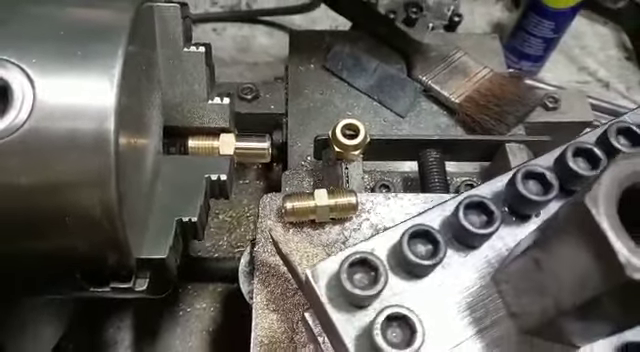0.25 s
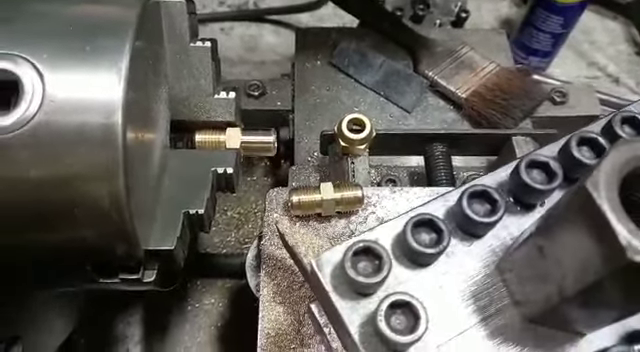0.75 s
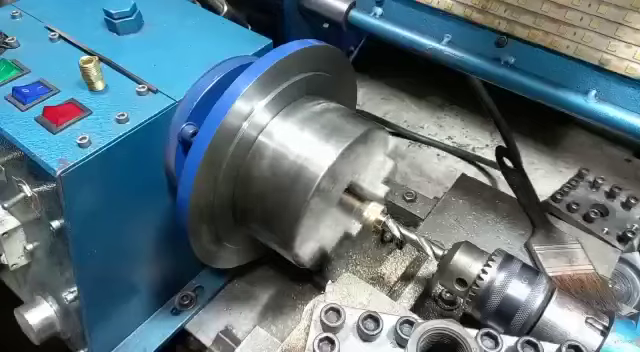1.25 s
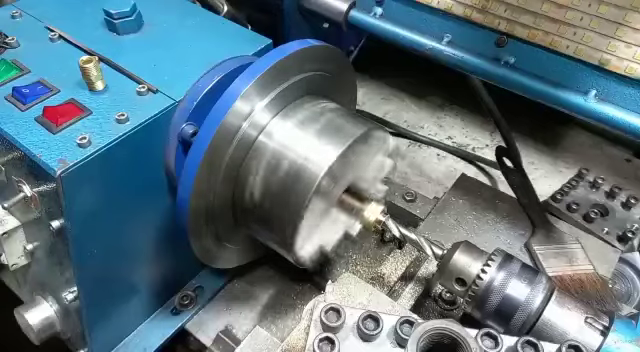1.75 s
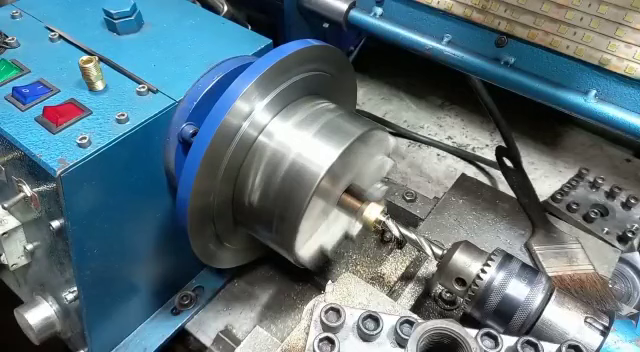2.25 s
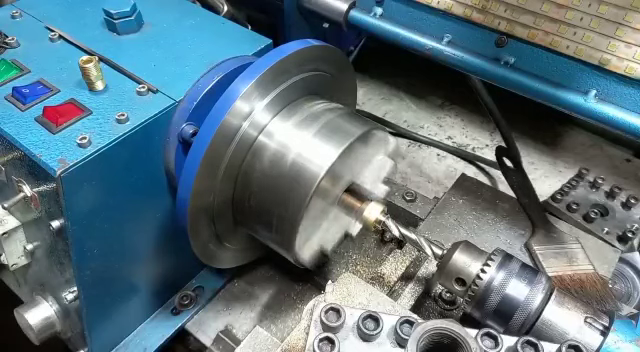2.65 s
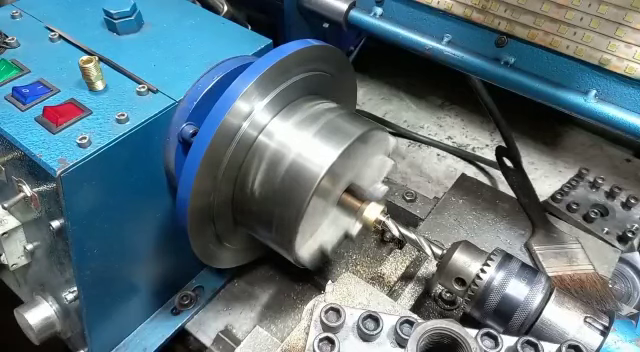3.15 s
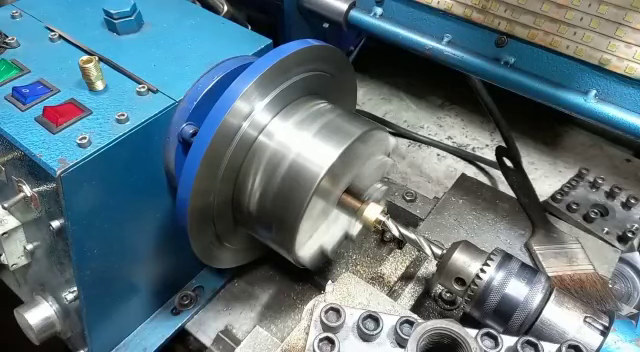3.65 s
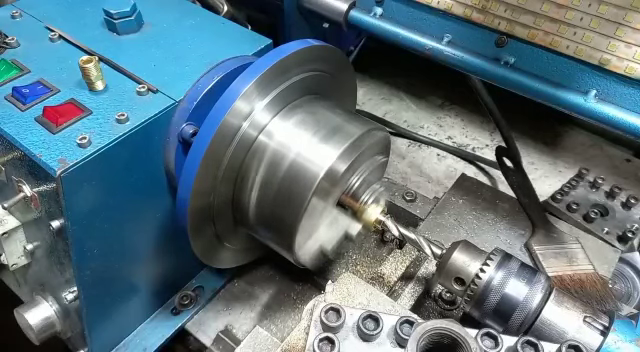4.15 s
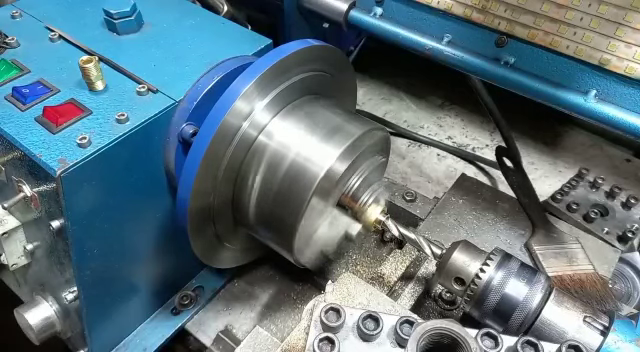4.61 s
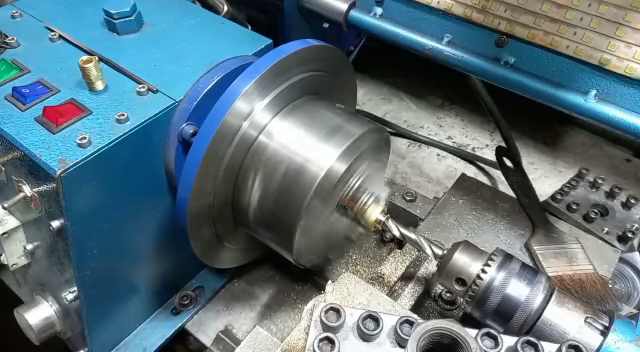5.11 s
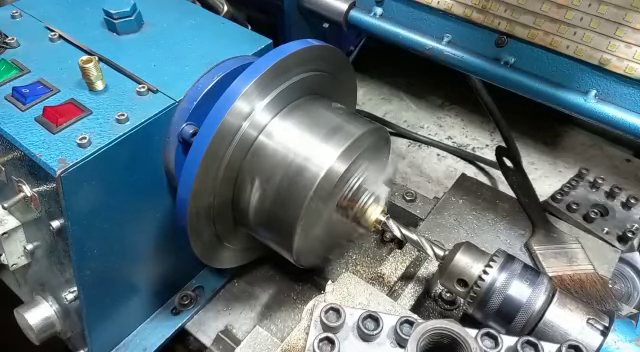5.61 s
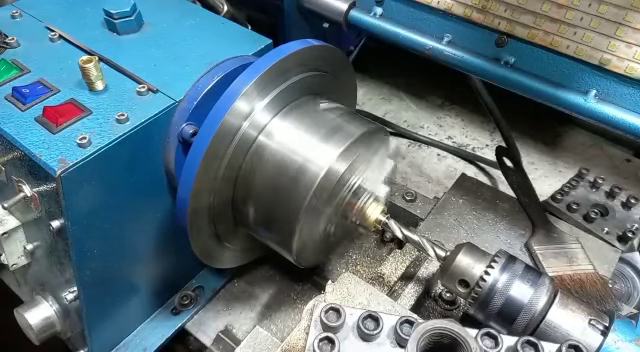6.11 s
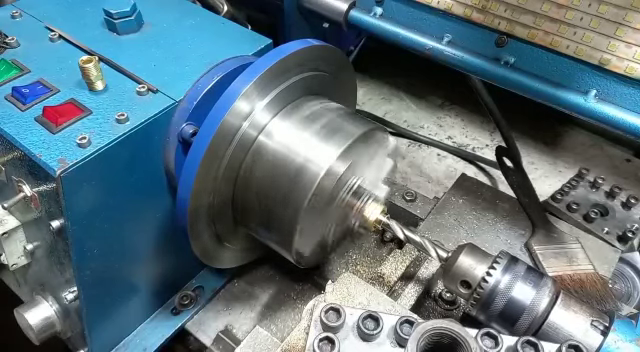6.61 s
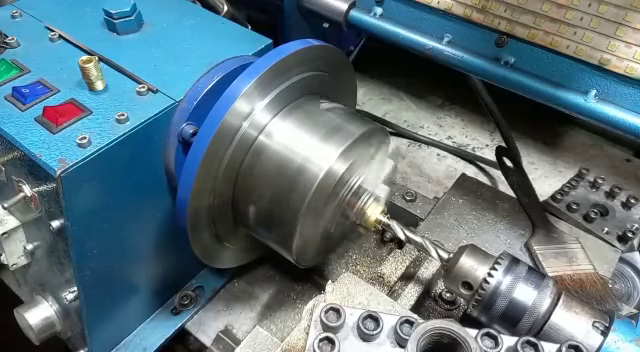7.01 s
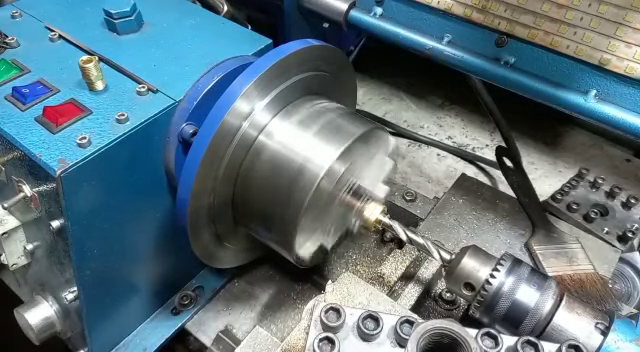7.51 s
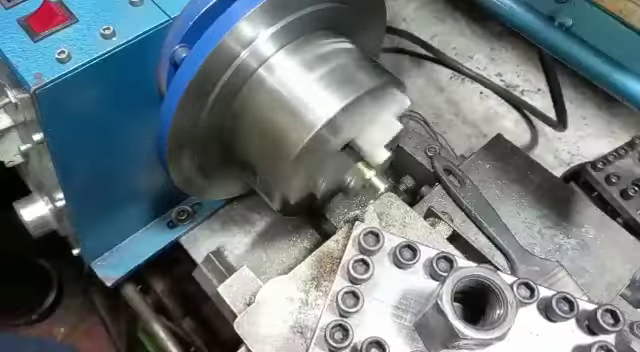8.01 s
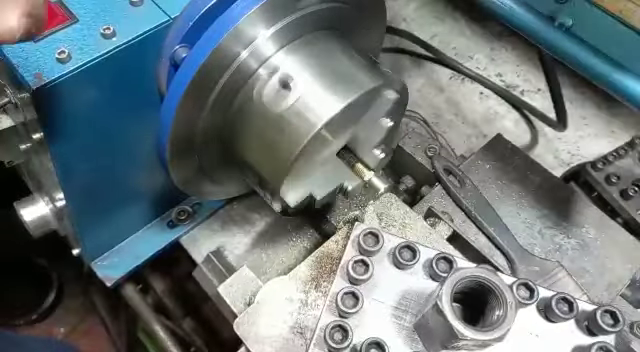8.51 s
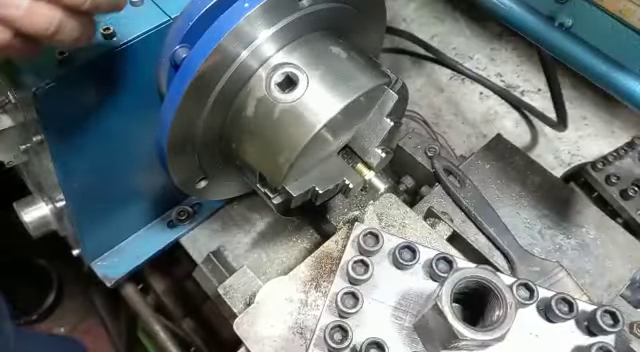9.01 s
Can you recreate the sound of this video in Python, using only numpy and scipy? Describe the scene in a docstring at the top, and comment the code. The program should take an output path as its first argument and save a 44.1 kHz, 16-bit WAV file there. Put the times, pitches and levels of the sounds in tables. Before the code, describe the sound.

Quiet workshop hum stops abruptly, then a drill squeals and hisses harshly into brass before the lathe whirs down and a switch clicks.

```python
"""A small metal lathe in a humming workshop, heard by two close microphones.
First only room noise, a fan and a soft hollow bump, which stop abruptly; then a drill bores into brass.
It chatters as a random swing amid hissing, ringing chip noise, locks into squeals with overtones as the
feed eases, then bites again under a lighter push, over gear growl and bed rumble.
Last the spindle runs free and fades with the drive's sine whine; switch clicks ring a panel."""
import sys
import numpy as np
from scipy import signal
from scipy.fft import rfft, irfft, next_fast_len
from scipy.io import wavfile
from scipy.ndimage import uniform_filter1d, map_coordinates

SR = 44100
rng = np.random.default_rng(int(sys.argv[2]) if len(sys.argv) > 2 else 0)


def file_out(sig):
    """Save sig as 16-bit WAV at sys.argv[1]."""
    # one column per channel
    cols = np.atleast_2d(sig).T
    # limit, then scale
    lim = np.clip(cols, -1, 1)
    pcm = np.round(lim * 32767).astype(np.int16)
    wavfile.write(sys.argv[1], SR, pcm)


N = 408321  # length (samples)
BREAK, DRILLING, RUNNING_FREE = 1.014, 1.095, 7.728  # first room noise ends, drilling starts and ends (s)


def amp(db):
    """Decibels to gain."""
    return 10 ** (np.asarray(db) / 20)


def unit(x):
    """Scaled to rms 1."""
    return x / np.sqrt(np.mean(np.abs(x) ** 2) + 1e-20)


def clock():
    """The time of every sample (s)."""
    return np.arange(N) / SR


def curves(rows):
    """One value per sample for each column after the time."""
    seconds, *columns = np.transpose(rows)
    return [np.interp(clock(), seconds, column) for column in columns]


def between(start, end):
    """1 from start to end, with 3 ms edges."""
    return np.clip(np.minimum(clock() - start, end - clock()) / .003, 0, 1)


def swells(rows):
    """Sum of bell-shaped envelopes, one for each (time [s], level [dB], spread [s]) row."""
    t = np.arange(0, N / SR, .0005)
    bells = 0
    for s, db, spread in rows:
        bells = bells + amp(db) * np.exp(-.5 * np.minimum(((t - s) / spread) ** 2, 100))
    return np.interp(clock(), t, bells)


def wobble(rate):
    """A smooth random curve, rate knots a second."""
    knots = rng.standard_normal(int(N * rate / SR) + 4)
    return map_coordinates(knots, [clock() * rate], order=2)


def filtered(x, response):
    """x times a response of frequency."""
    m = next_fast_len(N + 8192, True)
    return irfft(rfft(x, m) * response(np.fft.rfftfreq(m, 1 / SR)), m)[..., :N]


def colour(points):
    """Response through (frequency [Hz], level [dB]) points on a log axis."""
    f, db = np.transpose(points)
    return lambda hz: amp(np.interp(np.log(hz + 1), np.log(f), db))


def ringing(modes):
    """Response of (frequency [Hz], width [Hz], level [dB]) resonances with steep skirts."""
    return lambda hz: sum(amp(db) / (1 + ((hz - f) / width) ** 2) for f, width, db in modes)


def modal(depth_db, spacing_hz):
    """Response of many close small resonances, at random heights."""
    knots = rng.standard_normal(4096)
    return lambda hz: amp(depth_db * map_coordinates(knots, [hz / spacing_hz], order=1, mode="wrap"))


def pan(db):
    """Left and right gains of constant power, for a left-minus-right difference."""
    g = np.array([amp(db / 2), amp(-db / 2)]).reshape(2, -1)
    return g / np.sqrt(np.mean(g ** 2, axis=0))


def ears(pan_db, lag):
    """Direct sound reaches the two ears unequal and out of step by lag (rad)."""
    return pan(pan_db) * np.exp(.5j * np.array([-lag, lag]).reshape(2, -1))


# Two close microphones hear the low mids alike: (frequency [Hz], side against middle [dB])
STEREO_WIDTH = [(60, -4), (130, -17), (250, -11.5), (450, -9), (700, -2.5), (1100, 1.5), (2200, 1),
                (4000, 1), (6300, -1.5), (7500, 1.5), (9000, 6), (11000, -0.5), (13000, 5), (16000, -4)]


def noise(response, side_db):
    """Coloured stereo noise whose middle has rms 1; side_db widens or narrows it."""
    mid = filtered(rng.standard_normal(N), response)
    side = filtered(rng.standard_normal(N), lambda hz: response(hz) * colour(STEREO_WIDTH)(hz))
    return (mid + np.array([[1], [-1]]) * amp(side_db) * side) / np.std(mid)


def flutter(width_hz):
    """The complex envelope of a resonance driven at random."""
    pole = np.exp(-2 * np.pi * width_hz / SR)
    kicks = rng.standard_normal(N) + 1j * rng.standard_normal(N)
    return unit(signal.lfilter([1], np.poly([pole, pole]), kicks))


def patchy(x, depth_db):
    """Narrow bands swell and fade on their own for some tens of milliseconds."""
    z = signal.stft(x, nperseg=1024)[2]
    field = rng.standard_normal(z.shape[1:])  # the same for both ears
    field = uniform_filter1d(uniform_filter1d(field, size=4, axis=0), size=5, axis=1)
    varied = signal.istft(z * amp(depth_db * unit(field)), nperseg=1024)[1][:, :N]
    return unit(varied) * np.sqrt(np.mean(x ** 2))


# Room noise before drilling: (frequency [Hz], relative level [dB per Hz])
ROOM_BEFORE = [(30, -28), (70, -4.5), (130, -11), (250, -3), (400, -4), (650, -9.5), (1000, -14),
               (2200, -15), (4000, -19.5), (6600, -23.5), (7600, -32.5), (16000, -45)]
# Room noise after drilling: (frequency [Hz], relative level [dB per Hz])
ROOM_AFTER = [(30, -13), (80, 8), (180, -14), (280, 2.5), (380, 7), (520, 1), (800, -2.5), (2200, -5.5),
              (4000, -10.5), (6600, -15), (8000, -23.5), (16000, -38)]
# Fan resonances: (frequency [Hz], width [Hz], relative level [dB])
FAN_MODES = [(178, 12, -5.5), (241, 18, 1.5), (531, 8.5, -6), (2033, 36, -8), (2350, 140, -12),
             (6300, 290, -19.5)]


def workshop():
    """Coloured room noise and a fan's wavering hum before and after drilling, with one soft hollow bump."""
    before, after = between(-1, BREAK), between(RUNNING_FREE, np.inf)
    hum = amp(2.4 * wobble(11)) * np.sin(2 * np.pi * 258 * clock() + .4 * wobble(10))
    fan = noise(ringing(FAN_MODES), side_db=-1.0) + amp(3.5) * hum
    bump_envelope = swells([(.604, -37, 0.009), (.65, -51, .03)])
    bump = bump_envelope * np.sqrt(2) * np.sin(2 * np.pi * 357 * clock())
    first = amp(-50) * noise(colour(ROOM_BEFORE), side_db=0.5) + amp(-51.5) * fan + bump
    drone = amp(-57.5) * noise(ringing([(524, 9.5, 1), (2070, 40, -11)]), side_db=-4)
    last = amp(-52) * noise(colour(ROOM_AFTER), side_db=0.5) + amp(-58) * fan + drone
    return before * first + after * last


# Colour of the low rumble: (frequency [Hz], relative level [dB per Hz])
RUMBLE_COLOUR = [(20, -34), (40, -3), (60, -5), (82, 5), (115, 0.5), (160, -12), (300, -14.5), (800, -62)]


def rumble():
    """Low noise, stronger on the right and largely different at each ear."""
    shared, left, right = filtered(rng.standard_normal((3, N)), colour(RUMBLE_COLOUR))
    return pan(-10) * unit(shared + 1.3 * np.array([left, right])) * amp(1.5)


# Low puffs of air on the microphone: (time [s], relative level [dB], spread [s])
AIR_PUFFS = [(1.57, -39, .025), (3.1, -33.5, 0.032), (3.17, -49, 0.027), (6.05, -30, .015),
             (6.175, -29.5, 0.025), (6.92, -28, 0.027), (7.35, -21, 0.036), (7.895, -42, 0.013),
             (8.63, -37, 0.014), (8.868, -41, .01), (8.905, -48, 0.013)]


def puffs():
    """Air pushes on the microphone, heard as short swells of low rumble."""
    return swells(AIR_PUFFS) * rumble()


# Growl of the gearing under load: (time [s], relative level [dB])
GEAR_GROWL = [(1.13, -47), (4.08, -44), (4.92, -47.5), (6.24, -44), (6.79, -37.5), (7.71, -38)]
# Colour of the gear noise: (frequency [Hz], relative level [dB per Hz])
GEAR_COLOUR = [(25, -49), (80, 8), (130, -6), (310, -3.5), (480, 2.5), (620, -1.5), (850, -9), (1310, -8.5),
               (2000, -12), (5000, -45), (16000, -28)]
# Headstock housing and bed resonances: (frequency [Hz], width [Hz], relative level [dB])
HOUSING_MODES = [(180.8, 13.7, 0.5), (258.2, 5.4, 1.5), (501.4, 14, 5), (592, 8.3, -4), (1298, 6.2, 2)]
GEARS_DB = 2.67  # the whole growl over its curve
RUMBLE_DB, RUMBLE_GROWS = -56, 1.83  # bed rumble gain at the median growl (dB); dB per dB of growl


def headstock():
    """Gearing and bearings growl under load and ring the housing; the bed rumbles along with them."""
    growl, = curves(GEAR_GROWL)
    gears = amp(1.0) * noise(colour(GEAR_COLOUR), side_db=-3.5)
    housing = amp(-3.5) * noise(ringing(HOUSING_MODES), side_db=-24)
    bed_db = RUMBLE_DB + RUMBLE_GROWS * (growl - np.median(growl)) + 1.2 * wobble(7.6)
    bed = amp(bed_db) * rumble()
    return amp(growl + GEARS_DB + 0.75 * wobble(30)) * (gears + housing) + bed


# Spindle running free: (time [s], relative level [dB])
SPINDLE_LEVEL = [(7.73, -37.5), (8.02, -38.5), (8.1, -43.5), (8.45, -43.5), (8.56, -54.5), (8.8, -59),
                 (9.25, -64)]
# Colour of the spindle's whir: (frequency [Hz], relative level [dB per Hz])
SPINDLE_COLOUR = [(30, -35), (85, -0.5), (200, -17.5), (380, -7.5), (500, 1.5), (800, -12), (1050, -9.5),
                  (2000, -17), (4000, -23), (6500, -23.5), (8000, -35), (11000, -34), (16000, -40)]
# Motor drive whine over time: (time [s], relative level [dB])
DRIVE_LEVEL = [(7.73, -60), (8.28, -57.5), (8.45, -62), (8.62, -69), (8.8, -75), (8.88, -75), (9.05, -88),
               (9.25, -92)]
# Lines of the drive whine: (frequency [Hz], relative level [dB])
WHINE_LINES = [(5001, -5), (10002, 5.5), (15040, -8)]
# Thin chirps as the speed drops: (time [s], level [dB], spread [s])
SLOWING_CHIRPS = [(8.33, -59, .02), (8.415, -47, .012), (8.455, -48, 0.018), (8.505, -49, 0.02)]


def free_running():
    """The unloaded spindle whirs and fades; the motor drive whines at its switching rate."""
    whir = patchy(noise(colour(SPINDLE_COLOUR), side_db=-2), depth_db=1.5)
    whir = whir + amp(-8.5) * noise(ringing(HOUSING_MODES), side_db=5)
    spindle = amp(curves(SPINDLE_LEVEL)[0] + 0.5 * wobble(25)) * whir
    lines = 0
    for hz, db in WHINE_LINES:
        lines = lines + amp(db + 3.4 * wobble(13)) * np.sin(2 * np.pi * hz * clock() + .8 * wobble(70))
    reflected = noise(ringing([(hz, 30, db) for hz, db in WHINE_LINES]), side_db=1)
    drive = amp(curves(DRIVE_LEVEL)[0]) * (amp(-1) * lines + amp(-2) * reflected)
    chirps = swells(SLOWING_CHIRPS) * noise(ringing([(4830, 14, 7), (11800, 60, -15)]), side_db=-2)
    # three faint returns of the lowest whine line while coasting
    coasting_envelope = swells([(8.8, -61, .02), (8.96, -66, .035), (9.1, -66, .015)])
    coasting = coasting_envelope * np.sqrt(2) * np.sin(2 * np.pi * WHINE_LINES[0][0] * clock())
    return spindle + drive + chirps + coasting


# Clicks of the switch: (time [s], relative level [dB])
SWITCH_CLICKS = [(8.7233, -39), (8.727, -39.5), (8.737, -63), (9.092, -52)]
# Resonances of the switch and its panel: (frequency [Hz], width [Hz], relative level [dB])
PANEL_MODES = [(300, 120, -18), (1300, 300, -3), (2380, 110, -1), (3530, 160, 6), (4600, 160, 1),
               (6750, 360, 1), (9550, 220, -14), (11300, 500, -19), (12600, 170, -13)]


def switch(t60=.055):
    """The rocker switch snaps over with a dry clack and rings its panel, falling 60 dB in t60 (s)."""
    t = clock()
    blows = sum((t > s) * amp(db - 60 * np.clip(t - s, 0, 1) / t60) for s, db in SWITCH_CLICKS)
    clack_colour = colour([(200, 0), (1200, -6), (6500, -3), (8500, -16), (16000, -24)])
    clack = amp(-6.0) * noise(clack_colour, side_db=-1)
    return blows * (amp(-0.5) * noise(ringing(PANEL_MODES), side_db=-2) + clack)


# How hard the drill cuts: a hard push, a let-up, a lighter push: (time [s], load [dB])
CUTTING_LOAD = [(1.11, -26.5), (1.55, -25.5), (1.75, -27.5), (2.05, -26.5), (2.2, -30), (2.5, -31),
                (2.8, -27), (3.4, -28.5), (3.97, -28), (4.175, -21), (4.42, -42.5), (4.9, -45),
                (5.5, -44.5), (6.18, -43.5), (6.3, -40), (6.65, -40), (6.97, -35), (7.71, -36.5)]
# above this load the drill is wedged in the bore, which stiffens it and changes how it radiates
WEDGE_DB, WEDGE_RANGE_DB = -32.5, 1.18


def cutting_load():
    """The load on the cutting edges at every sample (dB)."""
    return curves(CUTTING_LOAD)[0]


# Whistling resonances of the cutting lips: (frequency [Hz], width [Hz], relative level [dB])
LIP_MODES = [(9130, 70, 9.5), (9340, 65, -5), (9590, 67, 13), (11300, 490, -18), (12700, 160, -23),
             (15200, 160, -21)]
WHISTLE_TOP_DB, WHISTLE_FULL_AT_DB, WHISTLE_GROWS = -35, -31, 1.28  # cap, load reaching it, dB per dB below


def whistle(turn):
    """The cutting lips whistle high up, pulsing once a revolution; friction caps the growth with load."""
    db = WHISTLE_TOP_DB + WHISTLE_GROWS * np.minimum(cutting_load() - WHISTLE_FULL_AT_DB, 0)
    return pan(-1.8) * amp(db + 1.2 * turn + 1.5 * wobble(22)) * noise(ringing(LIP_MODES), side_db=-1.2)


# Colour of the chip hiss: (frequency [Hz], relative level [dB per Hz])
CHIP_COLOUR = [(400, -16), (950, -5.5), (1300, -13.5), (1750, -9), (2400, -2), (3500, -5.5), (5400, -4),
               (6400, -2.5), (7500, 0.5), (8550, -9), (9150, -4.5), (10050, -11.5), (10900, -9),
               (16000, -15.5)]
# Drill, chuck and tailstock resonances: (frequency [Hz], width [Hz], relative level [dB])
STEEL_MODES = [(1697, 62, 11), (1898, 27, 13), (2270, 60, 7), (2615, 34, 6), (2980, 72, 6.5), (4380, 52, 8),
               (5980, 90, 3.5), (7460, 117, 5)]
# A chip catches and breaks: (time [s], relative level [dB], spread [s])
CHIP_SNAGS = [(4.625, -38, .008), (4.707, -28.5, 0.0049), (4.73, -40, 0.017), (4.885, -38, .008),
              (4.903, -27.5, 0.0044), (4.995, -37, 0.008), (5.078, -58, .007), (5.17, -36, 0.0033),
              (5.188, -34, 0.0061)]
# Colour of the snags: (frequency [Hz], relative level [dB per Hz])
SNAG_NOISE_COLOUR = [(1500, -39), (4500, -12), (5500, -10), (6300, 21), (8300, -10), (9300, 23),
                     (10500, -5), (13000, 15), (16000, -15)]
HISS_DB, RING_DB, RING_GROWS = -1, -37, 1.09  # hiss over the load; ring at the wedging load, dB per dB of load


def chips(turn):
    """Brass crumbles at the cutting edges; the tiny fractures hiss and ring the steel."""
    load = cutting_load()
    crumble = unit(amp(1.26 * wobble(900) + 1.27 * wobble(90)))
    hiss = amp(load + HISS_DB) * crumble * noise(colour(CHIP_COLOUR), side_db=-2)
    ring = amp(RING_DB + RING_GROWS * (load - WEDGE_DB)) * noise(ringing(STEEL_MODES), side_db=2.5)
    # the contact keeps shifting, and favours other resonances from moment to moment
    cut = patchy(hiss + ring, depth_db=2) * amp(.7 * turn)
    snag_grain = unit(amp(2.7 * wobble(500)))
    snags = amp(-3.5) * swells(CHIP_SNAGS) * snag_grain * noise(colour(SNAG_NOISE_COLOUR), side_db=0)
    machine = modal(depth_db=2, spacing_hz=45)
    return pan(-1.5) * filtered(cut + snags, machine)


# Overtones of the locked tone: (multiple of the pitch, relative level [dB])
SQUEAL_OVERTONES = [(2, -19), (3, -25), (4, -27), (5, -24), (6, -27.5), (7, -32), (8, -27.5), (9, -37),
                    (10, -31.5)]
OVERTONE_FLICKER_DB, OVERTONE_PURITY = .5, 2.2  # flicker per multiple; steady part against the blur


def overtones(phase, bite):
    """Uneven slips add overtones to the squeal, and blur the high ones most."""
    bite = bite * (1 + amp(37.5) * swells(CHIP_SNAGS))  # a caught chip sharpens the slips
    flicker = wobble(60)
    sounding = bite > 0
    sound = np.zeros((2, N))
    for multiple, overtone_db in SQUEAL_OVERTONES:
        blur = np.array([flutter(width_hz=35 + 7 * multiple) for ear in range(2)])
        slip = unit((OVERTONE_PURITY / multiple + blur) * amp(OVERTONE_FLICKER_DB * multiple * flicker))
        cycle = np.exp(1j * multiple * phase[sounding])
        sound[:, sounding] += amp(overtone_db) * np.real(slip[:, sounding] * cycle)
    return bite * sound


# Stick and slip lock into a tone: (start [s], end [s], pitch [Hz], relative level [dB],
# overtones [dB], left minus right [dB], lag between the ears [rad])
LOCKED_TONES = [(2.15, 2.936, 1554, -22.5, -6, 2.5, 1.43), (2.95, 3.9, 1565, -22.5, -7, 9, 1.16),
                (4.24, 4.344, 1514, -18, -3, -1, 2), (4.33, 4.728, 1504, -16.5, -2.5, 5.5, 1.87),
                (4.699, 4.84, 1483, -15.5, -5.5, 2.5, 3.6), (4.81, 4.99, 1498, -14.5, -9.5, 2, 2.4),
                (4.97, 5.10, 1482, -16, -10, 3, 3.2), (5.137, 5.28, 1476, -19, -7.5, 2, 3.3),
                (5.8, 5.88, 1472, -31.5, -6, -6, 3.6), (6.135, 6.19, 1492, -25.5, -14, -4, 2.05),
                (6.215, 6.28, 1504, -28, -12, -6, 2.4), (7.09, 7.21, 1489, -24, -14.5, -3, 2.47)]
SQUEAL_ATTACK_S, SQUEAL_RELEASE_S, SQUEAL_SAG_HZ_PER_S = 0.03, 0.031, 15


def squeal(turn):
    """Where stick and slip lock, the drill sings a sagging tone; overtones come out as the feed eases."""
    dip = 1 - swells([(4.715, -8, 0.0024)])  # the level dips briefly at a snag
    strength = dip * amp(1.2 * wobble(40) + 0.37 * turn)
    tone, pitch, bite = np.zeros((2, N), complex), np.zeros(N), np.zeros(N)
    for start, end, hz, db, overtones_db, pan_db, lag in LOCKED_TONES:
        span = slice(int(start * SR), int(end * SR))
        t = clock()[span]
        edges = np.minimum((t - start) / SQUEAL_ATTACK_S, (end - t) / SQUEAL_RELEASE_S)
        envelope = amp(db) * np.clip(edges, 0, 1)
        pitch[span] = hz - SQUEAL_SAG_HZ_PER_S * (t - t.mean())
        tone[:, span] += envelope * ears(pan_db, lag)
        bite[span] += envelope * amp(overtones_db)
    phase = 2 * np.pi * np.cumsum(pitch + 5 * wobble(25) + 7 * wobble(300)) / SR
    return np.sqrt(2) * strength * (np.real(tone * np.exp(1j * phase)) + overtones(phase, bite))


LOOSE_HZ, WEDGED_HZ, WAVER_HZ = 1493, 1602, 11.2  # chatter pitch, and its swing once a revolution when wedged
LOOSE_PAN_DB, WEDGED_PAN_DB = -3, -1  # left minus right
LOOSE_LAG, WEDGED_LAG = 3.5, 0.91  # between the ears (rad)
CHATTER_DB, CHATTER_GROWS = -26, 0.64  # level at the wedging load; dB per dB of load
FRICTION_LIMIT, TURN_SWELL_DB = .25, 1.0  # compression exponent; swell once a revolution


def chatter(turn):
    """The drill twists to and fro raggedly: louder and higher the harder it cuts."""
    load = cutting_load()
    wedged = .5 + .5 * np.tanh(.5 * (load - WEDGE_DB) / WEDGE_RANGE_DB)

    def blend(loose, tight):
        """From the loose to the wedged value."""
        return loose + (tight - loose) * wedged

    hz = blend(LOOSE_HZ, WEDGED_HZ) + WAVER_HZ * wedged * turn
    hz = hz + 7 * wobble(300) + blend(6.06, 17.93) * wobble(60)
    # reflections off the machine differ at each ear
    reflected = 0.67 * np.array([flutter(width_hz=40), flutter(width_hz=57)])
    direct = flutter(width_hz=55) * ears(0, blend(LOOSE_LAG, WEDGED_LAG))
    swing = unit(direct + reflected)
    swing = unit(swing / (1 + np.abs(swing) ** 2) ** FRICTION_LIMIT)  # friction limits the largest swings
    level = amp(CHATTER_DB + CHATTER_GROWS * (load - WEDGE_DB) + TURN_SWELL_DB * turn)
    vibration = np.real(swing * np.exp(2j * np.pi * np.cumsum(hz) / SR))
    return np.sqrt(2) * level * pan(blend(LOOSE_PAN_DB, WEDGED_PAN_DB)) * vibration


SPINDLE_HZ = 10.7  # revolutions a second while drilling


def scene():
    """The idle shop, the drilling, the run-down."""
    turn = np.sin(2 * np.pi * SPINDLE_HZ * clock() + .5 * wobble(1.65))  # the load varies once a revolution
    drill = whistle(turn) + chips(turn) + squeal(turn) + chatter(turn)
    boring = between(DRILLING, RUNNING_FREE) * (headstock() + drill)
    run_down = between(RUNNING_FREE, np.inf) * free_running()
    return workshop() + puffs() + boring + run_down + switch()


TOP_HZ = 15950  # band limit


def record(dry):
    """The camera keeps nothing above its band limit."""
    return filtered(dry, lambda hz: hz < TOP_HZ)


dry = scene()
out = record(dry)
file_out(out)
```